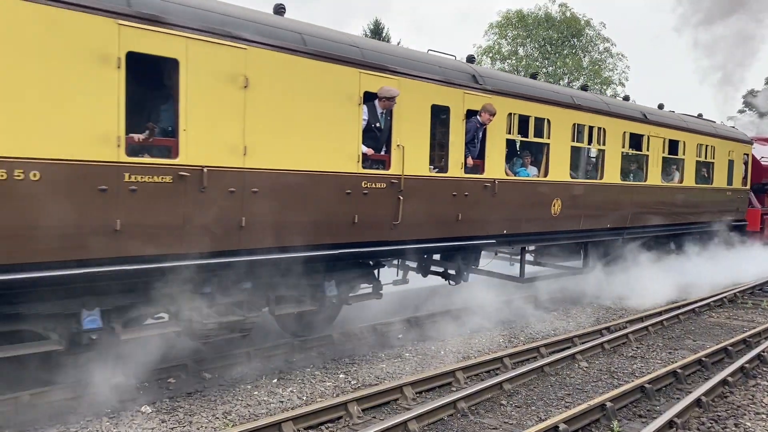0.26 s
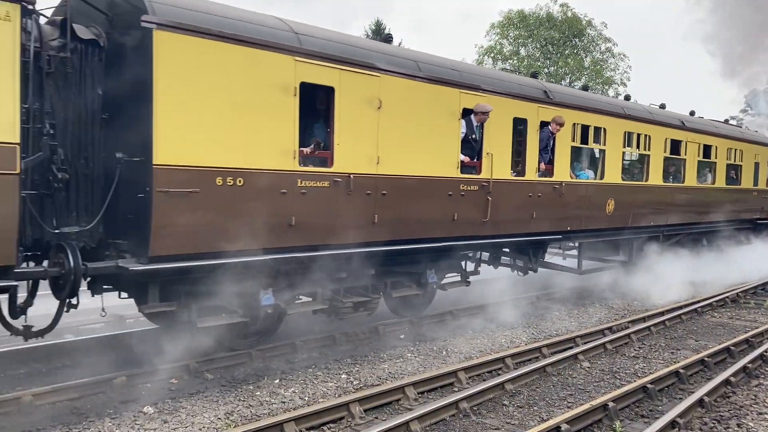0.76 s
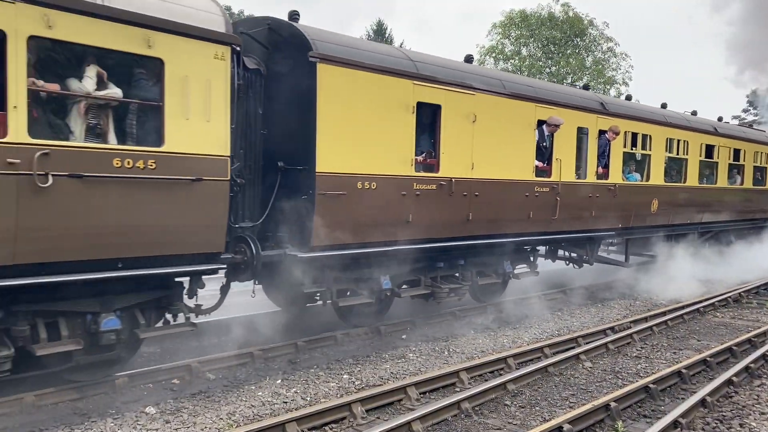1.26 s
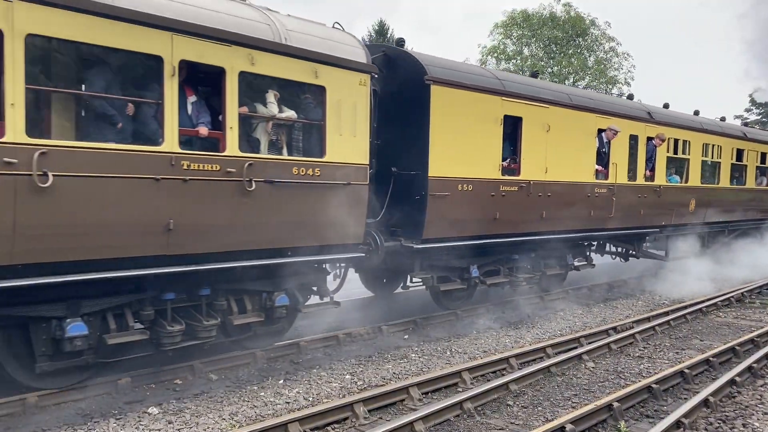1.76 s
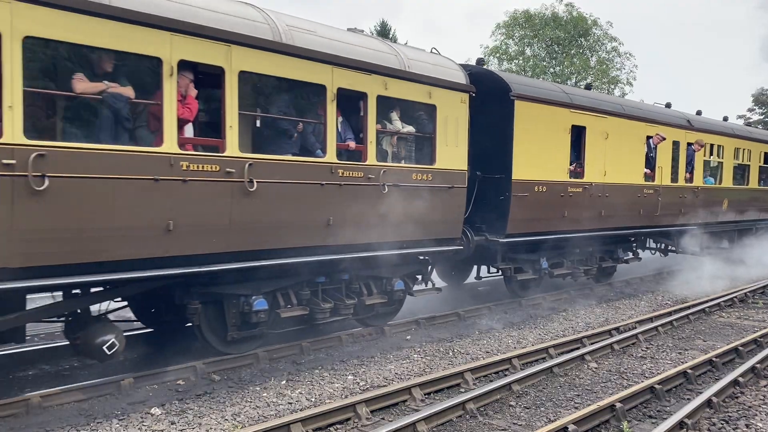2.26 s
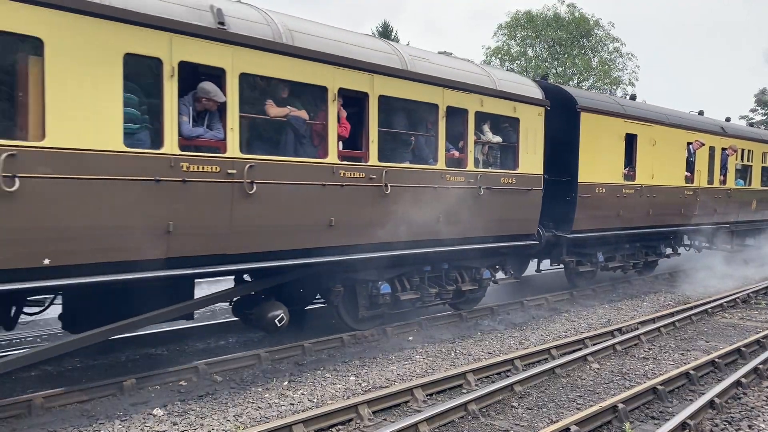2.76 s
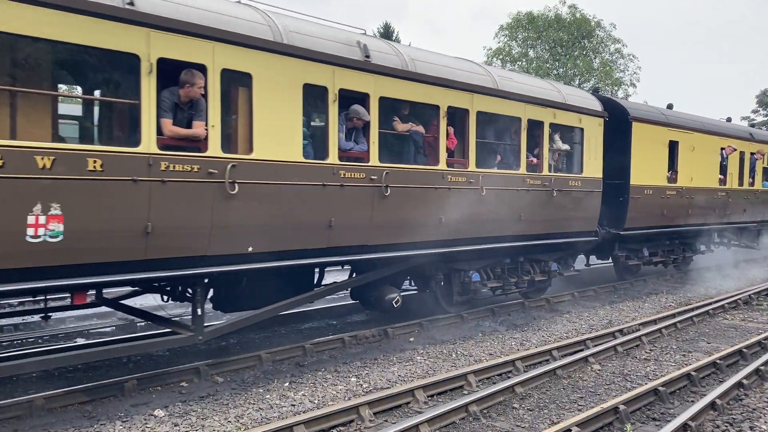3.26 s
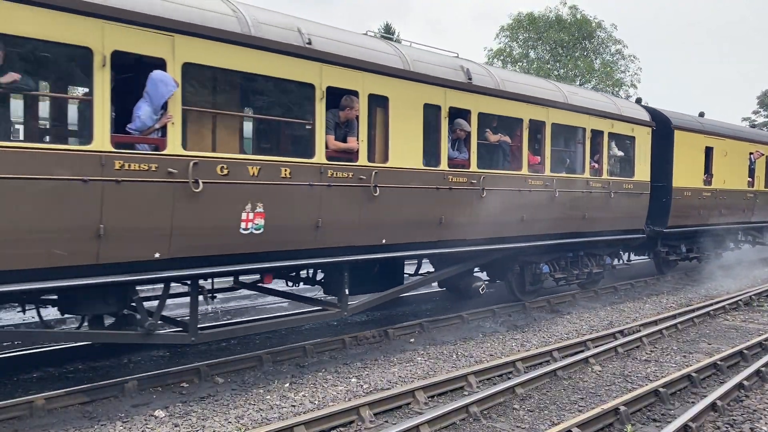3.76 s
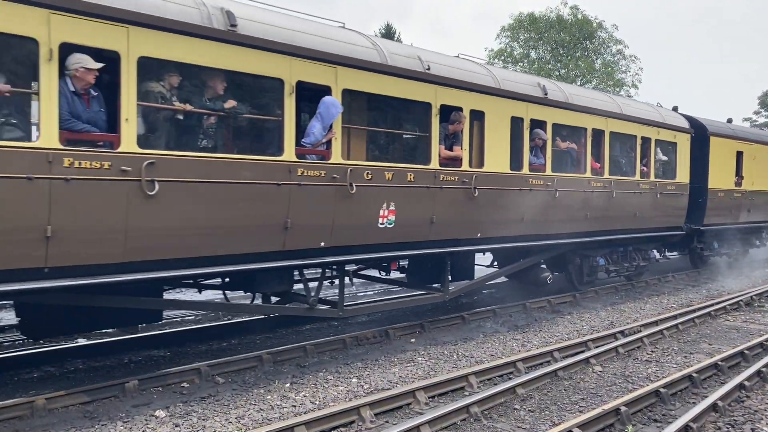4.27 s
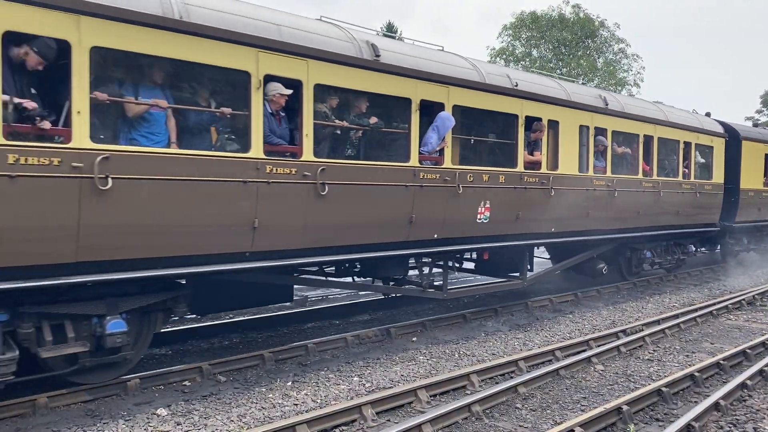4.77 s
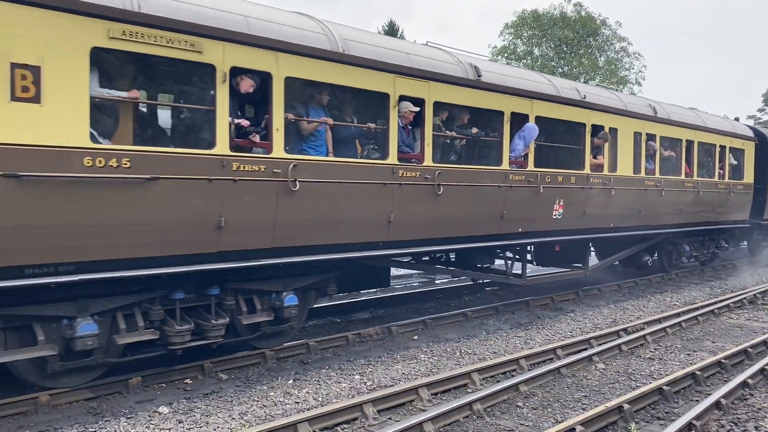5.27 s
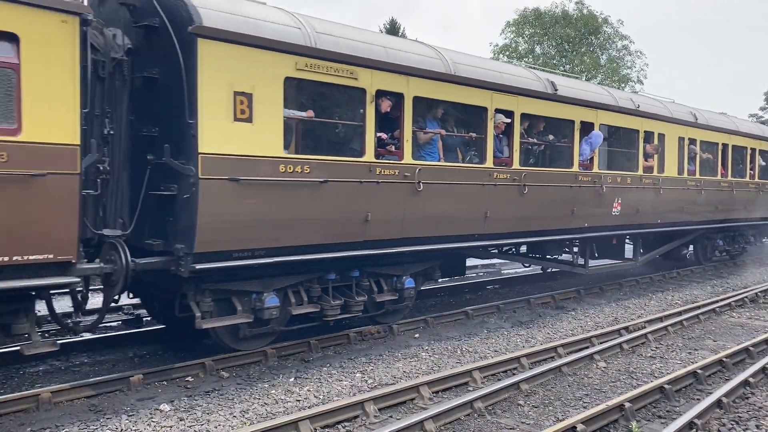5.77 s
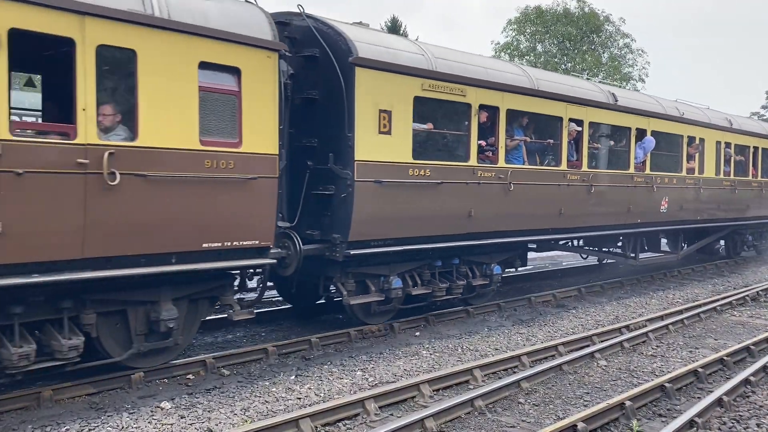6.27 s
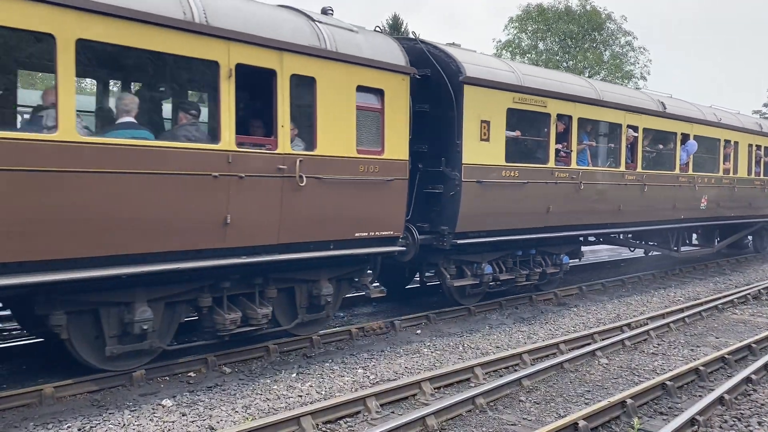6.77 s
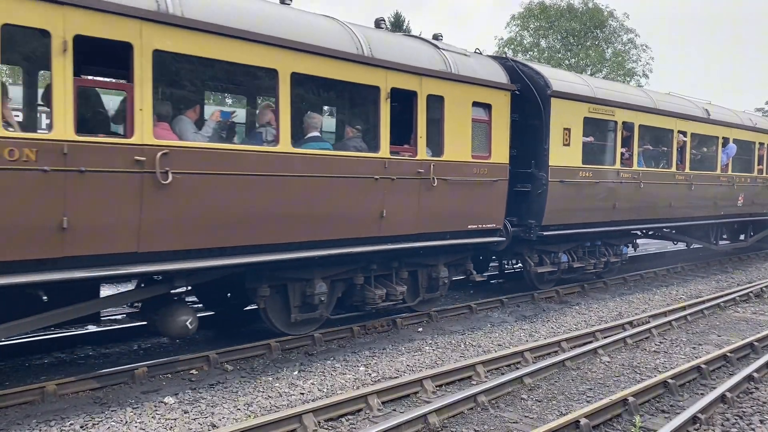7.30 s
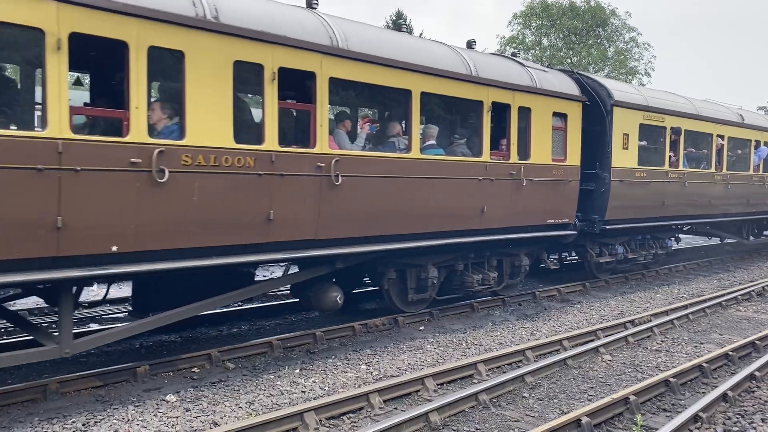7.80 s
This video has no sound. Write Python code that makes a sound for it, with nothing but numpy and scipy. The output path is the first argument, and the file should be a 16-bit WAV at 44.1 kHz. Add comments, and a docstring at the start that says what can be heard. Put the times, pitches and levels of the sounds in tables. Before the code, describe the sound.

A steam train pulls slowly away outdoors: pulsing hisses gradually weaken as passing coaches boom low and wheels knock over rail joints.

```python
"""A chimney chuffs about twice a second while wet steam hisses and spits with each piston stroke.
Filtered noise shaped stroke by stroke makes the steam, softening as the locomotive draws slowly away.
Close by the carriages rumble and boom: shaped noise, wavering panel resonances and swelling tones.
Wheels clack over two rail joints with knocks, bursts of noise and decaying modes; flanges squeak
in beating tones."""
import sys
import numpy as np
from scipy import signal
from scipy.fft import rfft, irfft, next_fast_len
from scipy.io import wavfile

SR = 44100
rng = np.random.default_rng(int(sys.argv[2]) if len(sys.argv) > 2 else 0)


def master_out(mix):
    """Clip the mix to full scale and print it as 16-bit PCM to the path in sys.argv[1]."""
    frames = np.transpose(np.atleast_2d(mix))
    ceiling = np.clip(frames, -1, 1)
    pcm = np.round(ceiling * 32767).astype(np.int16)
    wavfile.write(sys.argv[1], SR, pcm)


N = 354563
TIME = np.arange(N) / SR
SIZE = next_fast_len(N)
FREQ = np.maximum(np.arange(SIZE // 2 + 1) * SR / SIZE, 1)

# Piston strokes, short and long in turn. Each row: start in seconds, chuff level in dB before trim,
# chuff length in seconds, jet hiss in dB before trim, jet swell in seconds, jet length in seconds,
# throaty rush in dB re hiss, fine sizzle in dB re hiss, after-blow in dB, after-blow delay in seconds.
STROKES = [(-0.535, -45, .12, -36, .07, .14, 0, -3, -37, 0.39),
           (-0.025, -40, 0.17, -36.5, 0.067, 0.26, 4, 2, -33.5, 0.3),
           (0.57, -41, 0.13, -37, 0.18, 0.13, 12.5, 5.5, -40, 0.29),
           (1.09, -43, 0.23, -31, 0.058, 0.26, -2.5, -1.5, -38.5, 0.3),
           (1.681, -43, 0.14, -25.5, 0.15, 0.18, -0.5, -1, -46, 0.36),
           (2.238, -43, 0.16, -35.5, 0.056, 0.25, -2.5, -3.5, -39.5, 0.27),
           (2.822, -38, 0.053, -33.5, 0.13, 0.15, 5.5, 0.5, -45, 0.29),
           (3.344, -45, 0.18, -33, 0.097, 0.29, -5.5, -4.5, -41, 0.32),
           (3.921, -47, 0.053, -29.5, 0.1, 0.17, 2.5, -11, -51, 0.36),
           (4.449, -48, 0.21, -37.5, 0.11, 0.26, 0, -1, -45, 0.31),
           (5.052, -45, 0.12, -41.5, 0.067, 0.14, 9.5, -4.5, -53, .32),
           (5.576, -46.5, 0.13, -41, 0.035, 0.26, -1.5, -1.5, -44, 0.29),
           (6.152, -48, 0.13, -37, 0.056, 0.13, -1, -9, -46.5, 0.27),
           (6.641, -49, 0.21, -39.5, 0.11, 0.31, 0.5, -3, -42, 0.34),
           (7.242, -47, 0.074, -38.5, 0.054, 0.15, 6, -9, -46, 0.33),
           (7.73, -48, 0.15, -33, 0.089, 0.2, -3.5, -2, -39.5, 0.19)]
# Cylinder cocks on a short, then a long stroke. Each row: jet lag in seconds, jet release in seconds,
# after-blow swell, length and release in seconds, its rush in dB, its sizzle in dB, both re its hiss.
STROKE_KINDS = [(.005, .058, 0.045, 0.16, 0.067, -5.5, -0.5), (.008, .065, 0.079, 0.25, 0.096, 1, -1.5)]
# Colour of the chimney blast. Each row: frequency in Hz, relative level in dB.
CHUFF_COLOUR = [(300, -12.5), (700, -11.5), (1100, -9), (1700, -4), (3400, -1), (5000, -41)]
# Colours of the three parts of a steam jet. Each row: frequency in Hz, relative level in dB per Hz.
RUSH_COLOUR = [(1200, -13.5), (2100, -8.5), (3000, -1), (3900, 2.5), (5000, 0.5), (5700, -7), (7000, -14),
               (9000, -42)]
HISS_COLOUR = [(3500, -21), (5000, 0), (6300, 1.5), (7000, 6), (8500, 1.5), (11000, -7), (14000, -34)]
SIZZLE_COLOUR = [(7200, -1.5), (9600, 1), (11500, 0), (13500, -4.5), (15800, -9.5)]
# Breathy whistles in the jets. Each row: centre in seconds, level in dB, length in seconds,
# pitch in Hz, width in Hz.
WHISTLES = [(0.14, -33, 0.075, 8370, 700), (0.42, -32.5, .1, 5430, 1000), (0.715, -27, 0.025, 5100, 600),
            (0.88, -36, .05, 5280, 1000), (2.936, -35, .07, 7100, 400), (3.6, -32, 0.12, 9330, 1700),
            (4.092, -30, 0.088, 7710, 1110), (4.7, -35, 0.084, 9600, 1300)]
# Carriages rolling by. Each row: time in seconds, rumble in dB, body drone in dB before trim.
CARRIAGES = [(0, -46.5, -43), (3.8, -47.5, -43.5), (4.7, -47.5, -42), (5.4, -45, -42.5), (5.82, -41, -39.5),
             (5.95, -53, -45), (6.1, -41.5, -39), (6.9, -46.5, -41), (7.7, -40, -38), (8.04, -49, -39.5)]
# Colours of rumble, coach body and wheels on rail. Each row: frequency in Hz, relative level in dB per Hz.
RUMBLE_COLOUR = [(22, -30), (42, -6), (60, 0), (95, -0.5), (125, -1.5), (170, -33)]
BODY_COLOUR = [(90, -20), (125, -9), (150, -0.5), (168, -1.5), (230, -10), (260, -10), (310, -15.5),
               (420, -22.5)]
ROLLING_COLOUR = [(150, -3), (520, 0), (1050, -5.5), (1400, -3), (2200, -1), (5000, -6)]
# Wavering resonances of the coach sides. Each row: mean frequency in Hz, level in dB re untrimmed drone.
PANELS = [(168, -9.5), (250, -13.5)]
# Gain of the coach sides in each ear. Each row: gain in dB, left first, then right.
COACH_PAN_DB = [
    [-2],
    [1.5],
]
# Wheels singing as they roll. Each row: frequency in Hz, width in Hz, level in dB before the swell.
SINGING = [(683, 22, -73), (1180, 7.1, -78)]
# Swell of that singing. Each row: time in seconds, gain in dB.
SINGING_SWELL = [(0, 10.5), (3.8, 0), (4.3, 10.5), (8.04, 16)]
# Coach bodies lurch and boom. Each row: centre in seconds, level in dB, length in seconds, mean pitch in Hz.
BOOMS = [(0.37, -34, 0.022, 150), (2.18, -32.5, 0.016, 80), (3.16, -37, .018, 175), (3.27, -37.5, 0.1, 170),
         (4.645, -30.5, 0.028, 169.2), (4.99, -33, 0.029, 168.2), (5.20, -33.5, 0.041, 171.6),
         (5.545, -27.5, 0.019, 173), (5.75, -33, 0.13, 171.3), (5.86, -34, .018, 85),
         (7.175, -30.5, 0.031, 73.3), (7.97, -41, 0.046, 159)]
# Wheels over rail joints. Each row: start in seconds, clack in dB before trim, clack decay in seconds,
# knock in Hz, knock in dB before trim, wheel ring in dB re clack, thud in dB, which joint.
JOINTS = [(0.540, -39.5, 0.014, 507, -44, -13, -38, "ahead"), (1.3, -41, 0.02, 850, -41, -14, -43, "ahead"),
          (2.256, -37.5, 0.012, 980, -34.5, -20, -38, "ahead"),
          (2.642, -36, 0.028, 1090, -39, -3, -38, "left"),
          (2.834, -38.5, 0.018, 830, -40, -14, -49, "ahead"),
          (3.225, -37, 0.013, 794, -37, -7, -34.5, "left"),
          (4.045, -33.5, 0.014, 830, -28, -5.5, -35.5, "left"),
          (4.625, -37.5, 0.0086, 895, -37, -2.5, -34.5, "left"),
          (5.753, -34, 0.016, 1014, -35, -10, -45, "ahead"),
          (6.321, -34, 0.012, 880, -30, -9, -37.5, "ahead"),
          (7.125, -34, 0.018, 934, -28.5, -28, -36.5, "ahead"),
          (7.584, -29.5, 0.024, 710, -40, -4.5, -44, "left"),
          (7.693, -32.5, 0.016, 800, -29, -15, -34, "ahead")]
# Clack colour of each joint, by name. Each row: frequency in Hz, relative level in dB per Hz.
CLACK_COLOURS = {"ahead": [(200, 6), (380, -0.5), (590, 0.5), (1080, -2.5), (1400, -6.5), (2200, -6.5),
                 (3500, -35)], "left": [(200, 9), (350, -5.5), (480, 2), (630, 1), (820, 5), (1080, -10.5),
                 (1250, 2.5), (1500, -15), (2100, -2), (3500, -33)]}
# Lead of the left port at each joint, by name: milliseconds.
JOINT_LEAD_MS = {"ahead": 0.089, "left": 0.43}
# Modes of a wheel and of the bogie above it. Each row: frequency in Hz, mean strength in dB,
# 60 dB decay time in seconds.
WHEEL_MODES = [(464, -4.5, 0.21), (677, -9.5, 0.76), (1225, -2.5, 0.26), (1710, -13, 0.3),
               (2180, -16, 0.63)]
BOGIE_MODES = [(62.5, 0.5, 0.34), (81.4, -7, 0.66), (153, 2.5, 0.25), (258, -5.5, 0.32)]
# Flanges squeaking on the rail. Each row: start in seconds, level in dB, decay in seconds, pitch in Hz.
SQUEAKS = [(1.289, -43, 0.063, 1167), (2.82, -34, .022, 1166), (6.308, -33.5, .06, 1200),
           (6.316, -35, .016, 1690), (7.065, -45, 0.11, 1695), (7.135, -41, 0.055, 1186),
           (7.535, -41, 0.025, 1750), (7.679, -22, 0.011, 1200), (7.686, -38, 0.059, 1650)]
# Stereo likeness of the microphone pair. Each row: frequency in Hz, left-right likeness from 0 to 1.
LIKENESS = [(60, 1), (250, 0.96), (450, 0.5), (1100, 0.45), (1600, 0.27), (2300, 0.93), (4500, 1),
            (6000, 0.57), (7000, 0.98), (10000, 1), (15000, 0.31)]
# Stereo balance. Each row: frequency in Hz, left minus right in dB.
BALANCE = [(60, 0.5), (200, -4), (380, -3), (620, 2), (1250, -2.5), (2000, 0.5), (2700, 3.5), (4400, 1.5),
           (6200, 3), (7200, 0)]
# Stereo phase. Each row: frequency in Hz, lead of the left in radians.
PHASE = [(300, -0.19), (480, 1), (1000, -0.91), (1300, -1.6), (1900, -0.74), (2400, 0.44), (3300, 0.56),
         (4800, -0.38), (5600, -0.34), (6200, 0.75), (7500, -0.12)]
# Extra treble phase. Each row: frequency in Hz, lag of the left in cycles.
TREBLE_TURNS = [(7500, 0), (9100, .5), (10900, 1), (11700, 1), (13300, 1.5), (14700, 2)]

# steam leaking between the strokes: hiss at the start, its fall, rush and sizzle re hiss
LEAK_DB, LEAK_FALL_DB_PER_S, LEAK_RUSH_DB, LEAK_SIZZLE_DB = -43.5, 1, 1, -5
SAG_DB_PER_S = 4  # the pressure drops while a valve stays open
SIZZLE_LAG_S = 0.022  # the fine spray follows the jet
SHUTTING_S = 0.016  # a valve takes a moment to close
ROLLING_DB = -48.5  # wheels on the rail
CUTOFF_HZ = 15850


def from_db(db):
    """Decibels to gain."""
    return 10 ** (np.asarray(db) / 20)


def rms_one(x):
    """Scale to unit rms."""
    return x / np.sqrt(np.mean(x ** 2) + 1e-20)


def in_time(rows):
    """Draw each column of a curve at every sample."""
    s, *columns = np.transpose(rows)
    return [np.interp(TIME, s, c) for c in columns]


def over_hz(points):
    """Join a table by straight lines in log frequency."""
    hz, value = np.transpose(points)
    return np.interp(np.log(FREQ), np.log(hz), value)


def colour(points):
    """Gain of a spectrum table, falling away beyond both ends."""
    low_skirt = np.minimum(FREQ / points[0][0], 1)
    high_skirt = np.minimum(points[-1][0] / FREQ, 1)
    return from_db(over_hz(points)) * (low_skirt * high_skirt) ** 4


def resonance(hz, width_hz):
    """Gain of one resonance, 1 on top."""
    return 1 / np.hypot(1, (FREQ ** 2 - hz ** 2) / (FREQ * width_hz))


def white():
    """Spectrum of fresh white noise."""
    return rng.standard_normal(len(FREQ)) + 1j * rng.standard_normal(len(FREQ))


def flutter(rate_hz):
    """Random wander of spread 1, up to about the given rate."""
    return rms_one(irfft(white() / (1 + (FREQ / rate_hz) ** 2), SIZE)[:N])


def unsteady_clock(wander, wander_hz):
    """Time in seconds that runs a little fast and slow, so tones read from it waver."""
    return np.cumsum(1 + wander * flutter(wander_hz)) / SR


def microphones():
    """How the shared and the diffuse part of a sound reach each of the two ports."""
    alike = np.clip(over_hz(LIKENESS), 0, .995)
    sides = np.array([[1], [-1]])
    lead = over_hz(PHASE) - 2 * np.pi * over_hz(TREBLE_TURNS)
    ports = from_db(sides * over_hz(BALANCE) / 2) * np.exp(.5j * sides * lead)
    return ports * np.sqrt(1 + alike), ports * sides * np.sqrt(1 - alike)


def noise(gain, ports):
    """Stereo turbulence of the given colour, rms 1."""
    shared, diffuse = ports
    return rms_one(irfft(gain * (shared * white() + diffuse * white()), SIZE)[:, :N])


def puff(age, swell_s, length_s, release_s):
    """Steam flow through a valve: it swells, sags while open, and dies away as the valve gradually shuts."""
    opening = np.sin(np.pi / 2 * np.clip(age / swell_s, 0, 1))
    # the sag is centred, so the level holds halfway through
    sag = from_db(-SAG_DB_PER_S * (np.clip(age, 0, length_s) - length_s / 2))
    shut_s = SHUTTING_S * np.logaddexp(0, (age - length_s) / SHUTTING_S)
    return opening * sag * np.exp(-shut_s / release_s)


def chimney(ports, opening_s=0.085, dying_s=0.087, rough_db=0.4, trim_db=4.0):
    """The valve opens, the cylinder blows out through the blast pipe, and the puff dies away."""
    blast = sum(from_db(db) * puff(TIME - start, opening_s, length_s, dying_s)
                for start, db, length_s, *_ in STROKES)
    roughness = from_db(trim_db + rough_db * flutter(70))
    return blast * roughness * noise(colour(CHUFF_COLOUR), ports)


def cock_flow():
    """Strength of rush, hiss and sizzle: a steady leak, a jet with each stroke, then an after-blow."""
    leak_db = LEAK_DB - LEAK_FALL_DB_PER_S * TIME
    power = from_db([leak_db + LEAK_RUSH_DB, leak_db, leak_db + LEAK_SIZZLE_DB]) ** 2
    for k, stroke in enumerate(STROKES):
        start, _, _, db, swell_s, length_s, rush_db, sizzle_db, after_db, after_s = stroke
        lag_s, release_s, *after_shape, after_rush_db, after_sizzle_db = STROKE_KINDS[k % 2]
        span = slice(max(int(start * SR), 0), int(start * SR) + SR)
        age = TIME[span] - start
        jet = from_db(db) * puff(age - lag_s, swell_s, length_s, release_s)
        spray = from_db(db) * puff(age - SIZZLE_LAG_S, swell_s, length_s, release_s)
        after = from_db(after_db) * puff(age - after_s, *after_shape)
        power[:, span] += np.square([from_db(rush_db) * jet, jet, from_db(sizzle_db) * spray])
        power[:, span] += np.square([from_db(after_rush_db) * after, after, from_db(after_sizzle_db) * after])
    return np.sqrt(power)


def cylinder_cocks(ports, rush_db=-1.98, hiss_db=0.05, sizzle_db=0.9, spit_db=0.19, spit_growth=0.16,
                   surge_db=0.5, surge_hz=30, near_pitch=1.19, near_s=1.85):
    """Wet steam jets: water makes each jet sputter as a whole, more so the harder it blows."""
    rush, hiss, sizzle = cock_flow()
    level_db = 20 * np.log10(hiss)
    spit_depth_db = spit_db * np.exp(spit_growth * (level_db - level_db.mean()))
    sputter_db = spit_depth_db * flutter(107) + surge_db * flutter(surge_hz)
    # the rush is keener while the engine is still close
    near = np.exp(-(TIME / near_s) ** 2)
    keen_colour = [(hz * near_pitch, db) for hz, db in RUSH_COLOUR]
    roar = np.sqrt(near) * noise(colour(keen_colour), ports)
    roar += np.sqrt(1 - near) * noise(colour(RUSH_COLOUR), ports)
    jets = from_db(rush_db) * rush * roar
    jets += from_db(hiss_db) * hiss * noise(colour(HISS_COLOUR), ports)
    jets += from_db(sizzle_db) * sizzle * noise(colour(SIZZLE_COLOUR), ports)
    return from_db(sputter_db) * jets


def narrow_noise(hz, width_hz):
    """Turbulence in a resonance whose centre may move."""
    phase = 2 * np.pi * np.cumsum(hz * np.ones(N)) / SR
    return flutter(width_hz) * np.sin(phase) + flutter(width_hz) * np.cos(phase)


def carriages(ports, drone_trim_db=-1.16, grit_db=1.5, lumpy_db=1.0, wander=0.02498, wander_hz=4,
              surge_db=3.5, panel_width_hz=8):
    """Rough treads shake track and coach bodies, set panels wavering and keep the wheels singing faintly."""
    rumble_db, drone_db = in_time(CARRIAGES)
    swell_db, = in_time(SINGING_SWELL)
    lumps_db = lumpy_db * flutter(12)
    out = from_db(rumble_db + lumps_db) * noise(colour(RUMBLE_COLOUR), ports)
    out += from_db(drone_db + drone_trim_db + lumps_db) * noise(colour(BODY_COLOUR), ports)
    out += from_db(ROLLING_DB + grit_db * flutter(47)) * noise(colour(ROLLING_COLOUR), ports)
    for hz, db in PANELS:
        panel = narrow_noise(hz * (1 + wander * flutter(wander_hz)), panel_width_hz)
        out += from_db(drone_db + db + surge_db * flutter(3.8)) * panel * from_db(COACH_PAN_DB)
    for hz, width_hz, db in SINGING:
        out += from_db(db + swell_db) * noise(resonance(hz, width_hz), ports)
    return out


def jet_whistles(ports, wander=0.018, wander_hz=9):
    """A jet narrows to a breathy whistle of unsteady pitch: noise in a narrow band, swelling and fading."""
    clock = unsteady_clock(wander, wander_hz)
    out = np.zeros(N)
    for s, db, length_s, hz, width_hz in WHISTLES:
        air = flutter(width_hz) + 1j * flutter(width_hz)
        span = np.abs(TIME - s) < np.pi * length_s
        envelope = np.exp(-((TIME[span] - s) / length_s) ** 2)
        whistle = np.real(air[span] * np.exp(2j * np.pi * hz * clock[span]))
        out[span] += from_db(db) * envelope * whistle
    return irfft(ports[0] / np.sqrt(2) * rfft(out, SIZE), SIZE)[:, :N]


def body_booms(wander=0.0407, wander_hz=14.6):
    """The coach bodies lurch and boom: wavering tones, each swelling and fading about its moment."""
    clock = unsteady_clock(wander, wander_hz)
    booms = np.zeros(N)
    for s, db, length_s, hz in BOOMS:
        envelope = np.exp(-((TIME - s) / length_s) ** 2)
        booms += from_db(db) * envelope * np.sin(2 * np.pi * hz * clock)
    return booms * from_db(COACH_PAN_DB)


def ringing(modes, age, spread_db=2):
    """Struck modes, each with a strength of its own at every blow."""
    out = np.zeros(len(age))
    for hz, db, t60 in modes:
        decay = from_db(db + rng.normal(0, spread_db) - 60 * age / t60)
        out += decay * np.sin(2 * np.pi * (hz * age + rng.random()))
    return out


def dulled(x, hz):
    """A gentle low-pass."""
    return signal.sosfilt(signal.butter(2, min(hz, SR / 3), fs=SR, output="sos"), x)


def rail_joints(ports, rise_share=0.41, tail_s=0.042, tail_db=-7.0, scatter_db=-7, thud_s=0.0082,
                trim_db=0.5, impact_s=0.0051, knock_s=0.0025, dull_hz=2000, brightening=0.96,
                rattle_db=1.5, rattle_hz=60):
    """A wheel drops on the rail end: a hard knock, a clack of loose gear rattling, wheel and bogie ringing."""
    out, count = np.zeros((2, N)), SR // 2
    age = TIME[:count]
    direct, scattered = {}, {}
    for joint, points in CLACK_COLOURS.items():
        direct[joint] = rms_one(irfft(colour(points) * white(), SIZE)[:N])
        scattered[joint] = noise(colour(points), ports)
    rattle = rms_one(from_db(rattle_db * flutter(rattle_hz)))
    usual_db = np.mean([row[1] for row in JOINTS])
    for s, db, crack_s, knock_hz, knock_db, ring_db, thud_db, joint in JOINTS:
        at = int(s * SR)
        grain = rng.integers(N - count) + np.arange(count)  # a random stretch of noise for each blow
        rise = np.minimum(age / (rise_share * crack_s), 1)
        crack = rise * np.exp(-age / crack_s)
        tail = from_db(tail_db) * rise * np.exp(-age / tail_s) * rattle[grain]
        knock_shape = np.exp(-((age - impact_s) / knock_s) ** 2)
        knock = from_db(knock_db) * knock_shape * np.sin(2 * np.pi * knock_hz * age)
        ring = from_db(ring_db) * rise * ringing(WHEEL_MODES, age)
        hit = knock + from_db(db) * (direct[joint][grain] * crack + ring)
        late_hit = np.interp(age - JOINT_LEAD_MS[joint] / 1000, age, hit, left=0)
        both = np.array([hit, late_hit])
        both += from_db(db) * scattered[joint][:, grain] * (tail + from_db(scatter_db) * crack)
        # blows harder than the mean are brighter
        both = dulled(both, dull_hz * from_db(brightening * max(db - usual_db, 0)))
        thud = np.minimum(age / thud_s, 1) * ringing(BOGIE_MODES, age)
        blow = from_db(trim_db) * both + from_db(thud_db) * thud
        out[:, at:at + count] += blow[:, :N - at]
    return out


def flanges(beat_hz=13.6, rough=0.45, rough_hz=45):
    """A flange catches the rail, grates unevenly and rings in throbs as the wheel's twin modes beat."""
    grating = 1 + rough * (flutter(rough_hz) + 1j * flutter(rough_hz))
    out = np.zeros(N)
    for s, db, decay_s, hz in SQUEAKS:
        span = slice(int(s * SR), int(s * SR) + SR)
        age = np.maximum(TIME[span] - s, 0)
        envelope = np.sin(np.pi * beat_hz * age) * np.exp(-age / decay_s)
        out[span] += from_db(db) * envelope * np.real(grating[span] * np.exp(2j * np.pi * hz * age))
    return out


def mottled(x, depth_db, patch_hz, patch_s, size=1024):
    """Random peaks and dips of colour that come and go, each about so wide and so long."""
    hop = size // 4
    spectra = signal.stft(x, nperseg=size, noverlap=size - hop)[2]
    field = rng.standard_normal(spectra.shape[1:])
    # smooth the random field across frequency, then across time
    for axis, span in enumerate((patch_hz * size / SR, patch_s * SR / hop)):
        r = np.exp(-2 / span)
        field = signal.lfilter([1], [1, -2 * r, r * r], field, axis=axis)
    gain = rms_one(from_db(depth_db * rms_one(field)))
    return signal.istft(spectra * gain, nperseg=size, noverlap=size - hop)[1][:, :N]


def scene():
    """The engine ahead and the carriages close by, in the open air."""
    ports = microphones()
    engine = chimney(ports) + cylinder_cocks(ports) + jet_whistles(ports)
    # eddies shift the colour within each puff
    engine = mottled(engine, depth_db=1.1, patch_hz=300, patch_s=0.021)
    # reflections off track and coaches comb it finely
    engine = mottled(engine, depth_db=2.0, patch_hz=34.4, patch_s=0.084)
    return engine + carriages(ports) + body_booms() + rail_joints(ports) + flanges()


def record(dry):
    """Cut the top steeply with an elliptic low-pass."""
    return signal.sosfilt(signal.ellip(12, .1, 90, CUTOFF_HZ, fs=SR, output="sos"), dry)


dry = scene()
out = record(dry)
master_out(out)
```